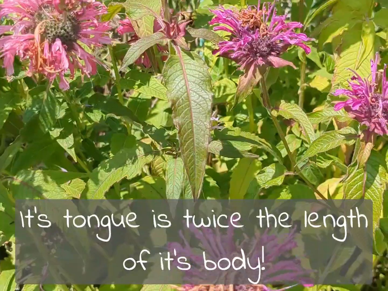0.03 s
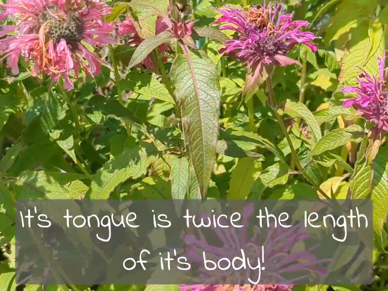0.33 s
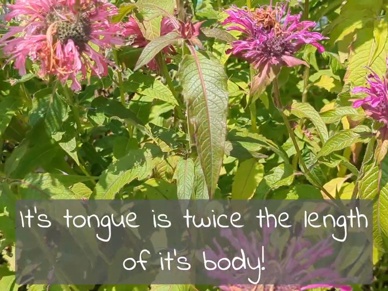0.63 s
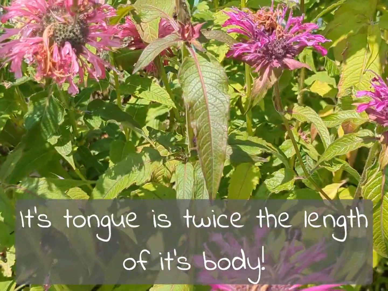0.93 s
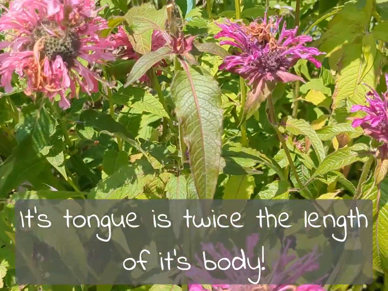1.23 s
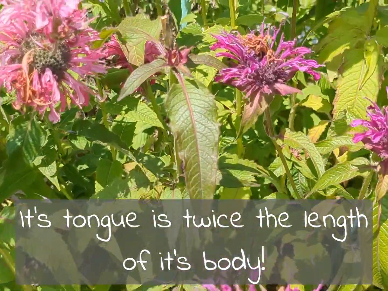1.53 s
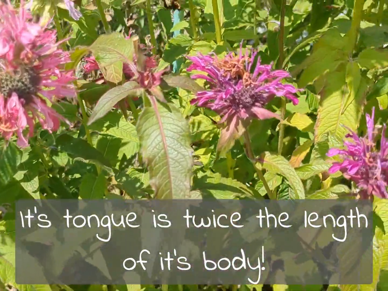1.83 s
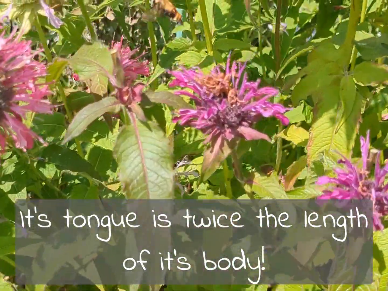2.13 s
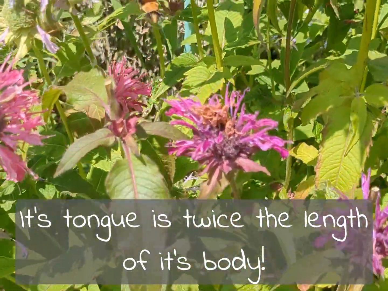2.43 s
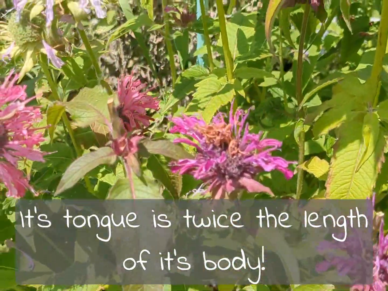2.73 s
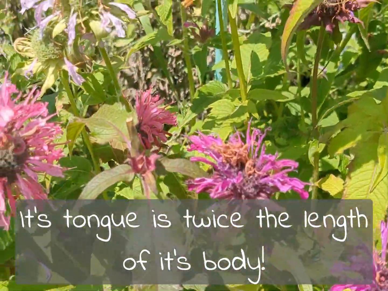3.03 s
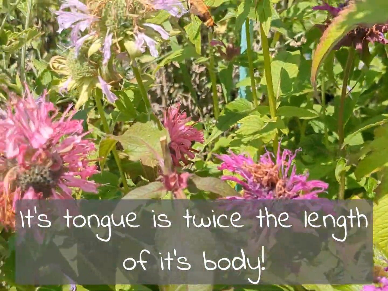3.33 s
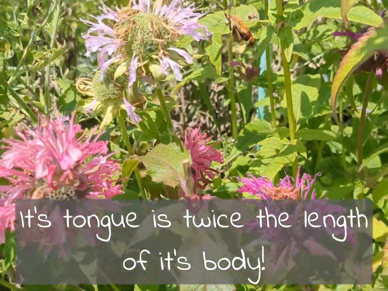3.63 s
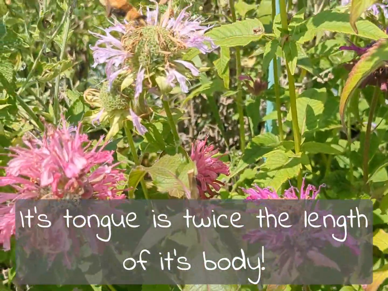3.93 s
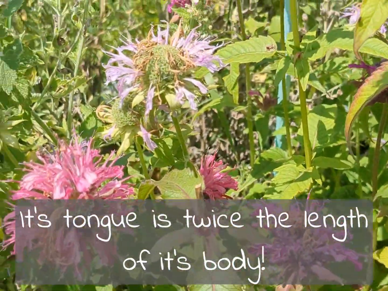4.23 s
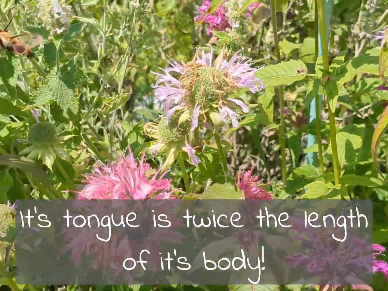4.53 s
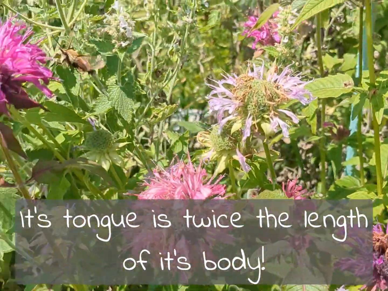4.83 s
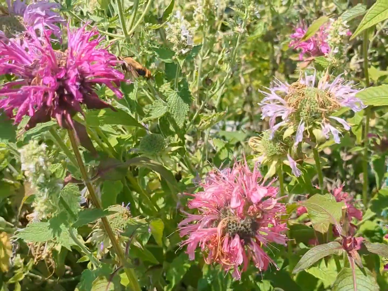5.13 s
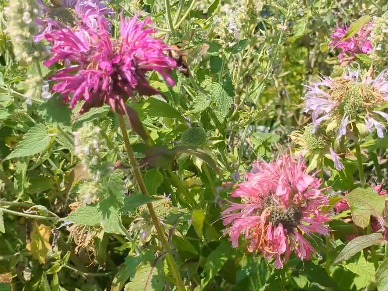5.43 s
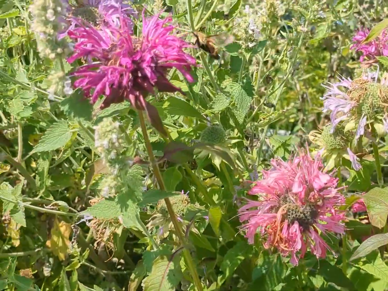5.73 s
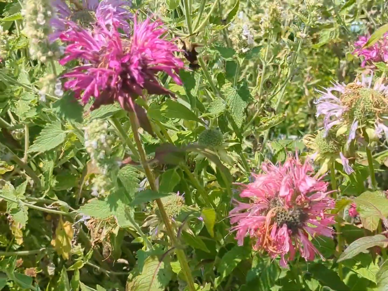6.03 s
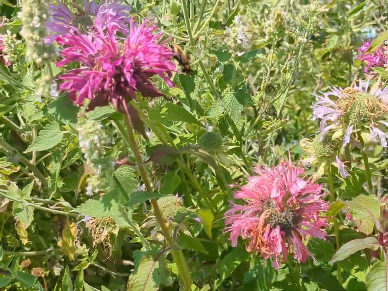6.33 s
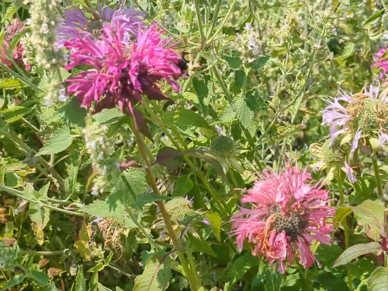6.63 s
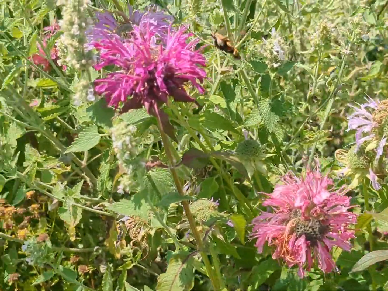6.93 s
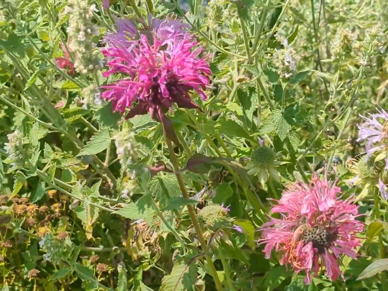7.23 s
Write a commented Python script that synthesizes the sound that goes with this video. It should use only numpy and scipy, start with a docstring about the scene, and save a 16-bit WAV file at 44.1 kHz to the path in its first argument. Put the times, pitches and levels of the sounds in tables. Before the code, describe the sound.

A garden opens quietly, with a soft airy hiss, a faint rush of mowing and short, high, falling chirps from small birds. At about 1 second the low drone of two petrol lawn mowers comes up some way off. Their engines beat against each other in an uneven throb, the farther one fading after about 4 seconds. The nearer one keeps approaching and is loudest from 5 to 7 seconds, with more blade rush and grass hiss. The birds chirp and peep irregularly throughout, busiest around 1.5 to 2, 3.5 to 4.5 and near 6 seconds. A few faint dry ticks come from the plants. At about 6.8 seconds a puff of wind gives the microphone a low bump. Near 7.3 seconds the sound drops out for an instant, then returns very briefly with a tick, a thinner drone and more hiss.

```python
"""A faint rush of mowing and the falling chirps of small birds are heard first, in a flower garden.
Two petrol mowers drone some way off: each sounds harmonics of its firing cycle, and the two sets beat
while one mower draws nearer. Decks, blades and cut grass add broadband noise, the plants tick in
damped bursts, and a puff of wind bumps the microphone. Near the end the sound drops out for a moment
and returns with a thinner drone and more hiss."""
import sys
import numpy as np
from scipy import signal
from scipy.fft import rfft, irfft, next_fast_len
from scipy.io import wavfile
from scipy.ndimage import uniform_filter1d

SR = 44100
rng = np.random.default_rng(int(sys.argv[2]) if len(sys.argv) > 2 else 0)


def dump_mix(stems):
    """Bounce the given channels to the path in sys.argv[1] as a 16-bit WAV at rate SR."""
    frames = np.atleast_2d(stems).T  # one column per channel
    limited = np.clip(frames, -1, 1)  # hard clip at full scale
    pcm = np.round(limited * 32767).astype(np.int16)
    wavfile.write(sys.argv[1], SR, pcm)


N = 330309
TIME = np.arange(N) / SR

# four-stroke cycle rate of the near engine: t/s, f/Hz
CYCLE_RATE = [(0, 25.0), (1, 24.95), (1.7, 24.95), (2.5, 25.06), (3.2, 25.16), (4, 25.27), (4.6, 25.33),
              (5.6, 25.35), (7.3, 25.28)]
# the near mower leaves cover and draws closer: t/s, level/dB relative to about its closest
NEARNESS = [(0, -29), (.4, -30), (.8, -25), (1.25, -12.5), (2, -10.5), (3.3, -8), (4.3, -6.5), (5.2, -3),
            (5.9, -2.5), (6.45, -0.5), (7.25, 0.5)]
# its exhaust boom when closest: order, level/dB
BOOM_ORDERS = [(2, -46), (4, -29), (5, -29), (6, -33)]
# the boom lines sink for a while: early on the upper lines start weaker, later a wall's echo cancels a line:
# t/s, order, half width/s, depth/dB
BOOM_FADES = [(.2, 5, 0.72, 3), (.3, 6, 0.47, 9), (1.7, 6, 1, 8), (5.1, 5, 0.62, 8), (6.05, 6, 0.13, 16),
              (6.85, 4, 0.2, 5), (6.85, 5, 0.19, 10), (7.07, 6, 0.21, 6.5)]
# its weaker harmonics: order, relative level/dB
OVERTONES = [(3, -8), (7, -8), (8, -4.5), (9, -3.5), (10, -14.5), (11, -13), (12, -20), (13, -16.5),
             (14, -25), (15, -14), (16, -16.5), (17, -13), (19, -18.5), (20, -28), (21, -16.5), (22, -16.5),
             (30, -22.5), (38, -19.5), (40, -21.5)]
# echoes smear the exhaust pulses, so the throb comes and goes: t/s, throb (0 to 1)
THROB = [(.8, 0.1), (1.4, 0.64), (3, 0.27), (4.2, 0.19), (5.2, 0), (5.9, 0.77), (6.3, 0.34), (7.3, 0.67)]
# the far mower swells and fades: t/s, gain/dB
FAR_GAIN = [(.8, -102), (1.25, -52.5), (2.75, -47.5), (3.3, -46), (3.9, -53.5), (4.7, -59), (6, -84)]
# its harmonics: order, relative level/dB
FAR_ORDERS = [(2, -26), (4, 4.5), (5, 5.5), (6, -6.5), (8, -25), (9, -27), (11, -26), (15, -22.5),
              (16, -22), (17, -32)]
# how much slower the far engine cycles: t/s, f/Hz
FAR_RATE_DEFICIT = [(2.75, .53), (3.4, .68)]
# mowing noise: t/s, relative blade rush level/dB, relative grass hiss level/dB
MOWING_LEVELS = [(0.1, -61.5, -69), (0.73, -61, -71.5), (0.87, -61.5, -72), (1.03, -57, -70),
                 (1.19, -56, -66), (1.35, -56.5, -67.5), (3.14, -56.5, -66.5), (4.85, -54, -66.5),
                 (5.65, -51, -60.5), (5.91, -52.5, -60.5), (6.66, -51, -60.5), (7.24, -52, -57)]
# spectra of deck, near blade, far blade and cut grass: f/Hz, relative density level/dB
DECK_SPECTRUM = [(20, 0), (40, 3), (65, 7.5), (120, 20), (180, 4.5), (280, 0.5), (420, 0.5), (600, -2),
                 (900, -6.5), (2000, -29.5)]
BLADE_SPECTRUM = [(200, -37), (450, -7), (700, -1), (980, 0), (1200, -1.5), (1600, -1.5), (2100, -5),
                  (3000, -13), (6000, -31)]
FAR_BLADE_SPECTRUM = [(300, -37), (600, -26), (850, 10.5), (1050, -13), (1330, 9.5), (1750, -15),
                      (2600, -24), (6000, -41)]
GRASS_SPECTRUM = [(1000, -30.5), (2000, -4), (2700, 3), (3400, 2), (4300, -3), (5500, -9), (7500, -12.5),
                  (11000, -18), (16000, -15.5)]
# spectra of background hiss and high shimmer: f/Hz, relative density level/dB
AIR_SPECTRUM = [(20, 3), (400, 1), (1500, -10), (4000, 5), (6300, 4), (8000, -3.5), (9300, 2.5), (11000, 3),
                (12500, 2), (14000, -8), (15200, 4), (16000, 3)]
SHIMMER_SPECTRUM = [(9000, -34), (12000, -16), (13300, 2), (14100, -9), (15200, -1), (16000, -4.5)]
# likeness of noise at the two ears: f/Hz, coherence
COHERENCE = [(20, 0.62), (45, 0.41), (130, 0.96), (290, 0.93), (640, 0.81), (1410, 0.49), (2400, 0.062),
             (3500, 0.021), (16000, 0.04)]
# falling chirps: t/s, duration/s, f/Hz from which the glide decays, source level/dB
CHIRPS = [(0.016, 0.044, 5900, -53.5), (0.068, .05, 4100, -57.5), (.74, 0.056, 4700, -59),
          (0.802, 0.066, 3450, -53.5), (1.182, .055, 5000, -60), (1.521, 0.044, 5900, -48),
          (1.658, 0.066, 5600, -56.5), (1.934, 0.032, 5500, -49), (1.958, 0.093, 3950, -51.5),
          (2.52, 0.06, 3550, -51.5), (3.221, 0.065, 5050, -52), (3.701, .045, 6200, -52),
          (3.771, 0.12, 2200, -58.5), (3.805, 0.057, 5200, -48.5), (3.881, 0.051, 3830, -49),
          (4.083, 0.059, 2650, -58), (4.215, 0.11, 2150, -59), (4.347, 0.048, 5100, -54.5),
          (4.39, 0.062, 3700, -48.5), (4.92, .04, 4500, -57), (5.341, 0.041, 5400, -57),
          (5.52, .05, 4400, -52.5), (5.75, 0.036, 4750, -54.5), (5.821, 0.053, 5700, -53.5),
          (5.914, 0.054, 4900, -52), (5.996, 0.062, 3700, -52), (6.183, 0.072, 4300, -47),
          (6.896, .04, 4950, -49.5), (6.941, 0.052, 3550, -49)]
# short, nearly level peeps: t/s, f/Hz, source level/dB
PEEPS = [(.115, 4260, -59), (.37, 5300, -61), (.635, 5700, -61), (1.035, 5600, -56), (1.455, 5900, -57),
         (1.56, 5050, -58), (1.745, 3440, -57), (1.75, 6550, -56), (2.255, 5740, -56), (2.27, 4500, -57),
         (2.65, 5570, -62), (3.13, 3020, -54.5), (3.571, 3000, -49), (3.75, 3850, -56), (4.0, 2755, -60),
         (6.06, 5870, -56)]
# dry ticks in the plants: t/s, centre f/Hz, width/octaves, initial level/dB, left minus right/dB
PLANT_TICKS = [(0.616, 9050, 0.63, -47, -1), (.904, 4920, .2, -53, -2), (1.214, 10000, .4, -49, -3),
               (1.802, 7000, .33, -55, 0), (2.233, 9500, .4, -44, -3), (2.49, 6660, .52, -43, 0),
               (3.324, 6800, .08, -46, 0), (3.53, 7100, 0.046, -45, -6), (7.352, 7600, 0.83, -37, -15),
               (7.3635, 10000, .17, -44, -36)]
# breeze on the microphone, before the bass cut: t/s, level/dB
BREEZE = [(.8, -67), (1.5, -52.5), (3.3, -47.5), (5, -60), (6.2, -75), (6.7, -39.5), (7.3, -43)]
# spectrum of that wind: f/Hz, relative density level/dB
WIND_SPECTRUM = [(20, -9), (45, 4), (64, 5.5), (95, 3.5), (200, -4.5), (280, -21.5), (700, -45)]
# partials of the drone after the dropout: f/Hz, level/dB
LATE_PARTIALS = [(75.4, -51), (150.7, -40.5), (306.8, -53.5), (387.6, -73), (543.7, -73)]
# hiss around that drone: f/Hz, relative density level/dB
LATE_HISS_SPECTRUM = [(20, -40), (60, -17), (150, -4), (280, -17), (450, -21), (1000, -21.5), (1700, -20.5),
                      (4400, -31), (8000, -34.5), (10000, -29.5), (13000, -37), (15500, -28)]

TICK_DECAY_S = .0018


def gain_of(db):
    """Amplitude ratio of a level in decibels."""
    return 10 ** (np.asarray(db) / 20)


def unit_rms(x):
    """A signal normalised to unit power."""
    return x / np.sqrt(np.mean(x ** 2) + 1e-20)


def spectrum_at(points, hz):
    """A spectrum table interpolated on a log-frequency axis."""
    f, value = np.transpose(points)
    return np.interp(np.log(hz + 1), np.log(f + 1), value)


def curves(rows):
    """Each column of a time table, interpolated sample by sample."""
    s, *columns = np.transpose(rows)
    return [np.interp(TIME, s, c) for c in columns]


def add(mix, s, sound):
    """Superposition: a sound joins the mix at s seconds."""
    part = mix[..., max(round(s * SR), 0):][..., :sound.shape[-1]]
    part += sound[..., :part.shape[-1]]


def wander(hz):
    """Random fluctuation of unit rms, low-passed at about hz."""
    white = rng.standard_normal(N // 100 + 1)
    f = np.fft.rfftfreq(len(white), TIME[-1] / len(white))
    slow = unit_rms(irfft(rfft(white) / (1 + (f / hz) ** 4), len(white)))
    return np.interp(TIME, np.linspace(0, TIME[-1], len(white)), slow)


def noise(spectrum, patchy_db):
    """Partial coherence: coloured noise with drifting patches, alike in both ears at low frequencies."""
    hz = np.fft.rfftfreq(1024, 1 / SR)
    a, b, c, d, patches = rng.standard_normal((5, N // 256 + 5, len(hz)))
    patches = uniform_filter1d(patches, size=16, axis=0)
    patches = unit_rms(uniform_filter1d(patches, size=10, axis=1))
    coherence = np.clip(spectrum_at(COHERENCE, hz), -1, 1)
    left = a + 1j * b
    right = coherence * left + np.sqrt(1 - coherence ** 2) * (c + 1j * d)
    frames = np.array([left, right]) * gain_of(patchy_db * patches)
    white = signal.istft(frames.transpose(0, 2, 1), nperseg=1024, noverlap=768)[1]
    size = next_fast_len(white.shape[1])
    shape = gain_of(spectrum_at(spectrum, np.fft.rfftfreq(size, 1 / SR)))
    return unit_rms(irfft(rfft(white, size) * shape, size)[:, :N])


def firing_cycles():
    """Phase is the integral of frequency: cycles completed by the near engine."""
    return np.cumsum(curves(CYCLE_RATE)[0]) / SR


def boom_level(order, db):
    """Destructive interference: an exhaust line grows with nearness, the upper lines start weaker, and a line
    sinks where an echo cancels it."""
    loss_db = sum(depth * np.exp(-((TIME - s) / width) ** 2)
                  for s, k, width, depth in BOOM_FADES if k == order)
    return db + curves(NEARNESS)[0] - loss_db


def engine(cycles, lines, phases, jitter_cycles, unevenness=.058):
    """Periodic firing gives a harmonic series; no two firings are quite alike in strength or timing."""
    cycles = cycles + jitter_cycles * wander(7.1)
    tone = np.zeros(N)
    for order, db in lines:
        fading_db = min(.02 * order ** 2, 2.5) * wander(3)  # moving air sways the higher lines most
        tone += gain_of(db + fading_db) * np.cos(2 * np.pi * (order * cycles + phases[order]))
    return np.sqrt(2) * tone * (1 + unevenness * wander(15))


def mowers(opposed_at_s=2.595, ear_delay_s=.00009):
    """Beats: two engines run at nearly the same speed, so each order beats at its own rate."""
    cycles = firing_cycles()
    side_phase = (1 + curves(THROB)[0]) / 4  # orders 4 and 6 throb most when aligned with order 5
    phases = dict(enumerate(rng.random(size=64))) | {4: side_phase, 5: 0, 6: side_phase}
    overtone_db = -45 + 1.43 * curves(NEARNESS)[0]  # overtones grow faster than the boom
    lines = [(order, boom_level(order, db)) for order, db in BOOM_ORDERS]
    lines += [(order, overtone_db + db) for order, db in OVERTONES]
    near = engine(cycles, lines, phases, jitter_cycles=.0015)
    lag = np.cumsum(curves(FAR_RATE_DEFICIT)[0]) / SR
    lag -= np.interp(opposed_at_s, TIME, lag)  # here the two drones are in antiphase
    far = engine(cycles - lag, FAR_ORDERS, phases, jitter_cycles=.0012)
    drone = near - gain_of(curves(FAR_GAIN)[0]) * far
    return np.array([np.interp(TIME - ear_delay_s, TIME, drone), drone]) * gain_of([[-.3], [.3]])


def mowing(tufts_db=.84, firing_db=.54, blade_db=.75):
    """Modulated noise: decks roar, grass hisses, and the rush flutters with tufts, firings and turns."""
    rush_db, hiss_db = curves(MOWING_LEVELS)
    roar = gain_of(-45 + .86 * curves(NEARNESS)[0]) * noise(DECK_SPECTRUM, patchy_db=2.5)
    rush = gain_of(rush_db + 1.5) * noise(BLADE_SPECTRUM, patchy_db=1)
    far_rush = gain_of(curves(FAR_GAIN)[0] - 14) * noise(FAR_BLADE_SPECTRUM, patchy_db=2)
    hiss = gain_of(hiss_db + 7.5) * noise(GRASS_SPECTRUM, patchy_db=1.8)
    angle = 2 * np.pi * firing_cycles()  # the blade turns twice per firing
    flutter = gain_of(tufts_db * wander(45) + firing_db * np.cos(angle) + blade_db * np.cos(2 * angle))
    return roar + flutter * (rush + far_rush) + hiss


def air(waver_db=1.2, fade_db_per_s=.4):
    """Broadband background noise: a soft steady hiss under a wavering high shimmer."""
    steady = gain_of([[-57.6], [-57.1]]) * noise(AIR_SPECTRUM, patchy_db=2.5)
    shimmer_db = -60 + waver_db * wander(4) - fade_db_per_s * TIME
    return steady + gain_of(shimmer_db) * noise(SHIMMER_SPECTRUM, patchy_db=1.6)


def chirp_pitch(length_s, top_hz, floor_hz=1705, fall_s=.088, hook_depth=.12, hook_s=.00706):
    """Exponential relaxation: the pitch flicks upward, then falls toward a floor."""
    t = np.arange(round(length_s * SR)) / SR
    glide = floor_hz + (top_hz - floor_hz) * np.exp(-t / fall_s)
    return glide * (1 - hook_depth * np.exp(-t / hook_s))


def whistles(notes, fm_depth=.025, am_depth=.42):
    """Random frequency and amplitude modulation make tones rasp; notes are t/s, f/Hz curve, level/dB."""
    song, wobble, shake = np.zeros(N), wander(200), wander(110)
    for s, hz, db in notes:
        hz = hz * (1 + fm_depth * np.interp(s + TIME[:len(hz)], TIME, wobble))
        envelope = gain_of(db) * np.sqrt(2) * signal.windows.tukey(len(hz), .25)
        add(song, s, envelope * np.sin(2 * np.pi * np.cumsum(hz) / SR))
    return song * (1 + am_depth * shake)


def garden_echoes(sound, t60_s=.25):
    """Scattering: fences and trees return decaying echoes, different at each ear."""
    t = np.arange(SR // 2) / SR
    taps = rng.standard_normal((2, len(t))) * gain_of(-60 * t / t60_s)
    taps *= rng.random((2, len(t))) < 1500 / SR  # about 1500 echoes a second
    taps /= np.linalg.norm(taps, axis=1, keepdims=True)
    return signal.fftconvolve(sound[None], taps, axes=1)[:, :N]


def birds(direct_db=-1.5, echo_db=-6.5, ear_delay_s=.00006, peep_s=.062, peep_sag=.04):
    """Direct and reflected sound: chirps and peeps take both paths, the far twitter only the echo."""
    sag = 1 - peep_sag * np.linspace(-.5, .5, round(peep_s * SR))
    chirps = [(s, chirp_pitch(length, hz), db) for s, length, hz, db in CHIRPS]
    peeps = [(s, hz * sag, db) for s, hz, db in PEEPS]
    song = whistles(chirps + peeps)
    ears = np.array([np.interp(TIME - ear_delay_s, TIME, song), song])
    return gain_of(direct_db) * ears + garden_echoes(gain_of(echo_db) * song + far_twitter())


def far_twitter(count=30, length_s=.053, range_hz=(3000, 5400)):
    """Independent sources: farther birds chirp faintly at random moments and pitches."""
    when, pitch, strength = rng.random((count, 3)).T
    top_hz = np.interp(pitch, [0, 1], range_hz)
    level_db = -64 + 6 * (2 * strength - 1)
    calls = zip(when * TIME[-1], top_hz, level_db)
    return whistles([(s, chirp_pitch(length_s, hz), db) for s, hz, db in calls])


def fine_crackle(ticks_per_s=14, level_db=-71, band_hz=(5000, 14000)):
    """A Poisson process: faint, sparse high ticks at random moments."""
    impulses = (rng.random(N) < ticks_per_s / SR) * rng.uniform(.3, 1, N)
    envelope = signal.lfilter([1], [1, -np.exp(-1 / (TICK_DECAY_S * SR))], impulses + 1e-12)
    bursts = envelope * rng.standard_normal((2, N))
    band = signal.butter(2, band_hz, "band", fs=SR, output="sos")
    return gain_of(level_db) * unit_rms(signal.sosfilt(band, bursts))


def plant_ticks():
    """Damped transients: each tick is one band of noise that dies within milliseconds."""
    out, t = np.zeros((2, N)), np.arange(2048) / SR
    hz = np.fft.rfftfreq(len(t), 1 / SR)
    for s, centre, width, db, pan_db in PLANT_TICKS:
        band = np.exp(-.5 * (np.log2((hz + 1) / centre) / width) ** 2)
        burst = unit_rms(irfft(rfft(rng.standard_normal((2, len(t)))) * band))
        ears = gain_of([[db + pan_db / 2], [db - pan_db / 2]])
        add(out, s, ears * burst * np.exp(-t / TICK_DECAY_S))
    return out


def wind(puff_at_s=6.86, puff_width_s=.066, puff_db=-34.5, low_cut_hz=43.4):
    """Pressure fluctuation: a breeze and one puff rumble on a microphone that loses the deepest bass."""
    puff = gain_of(puff_db) * np.exp(-((TIME - puff_at_s) / puff_width_s) ** 2)
    rumble = (gain_of(curves(BREEZE)[0]) + puff) * noise(WIND_SPECTRUM, patchy_db=2)
    return signal.sosfilt(signal.butter(6, low_cut_hz, "high", fs=SR, output="sos"), rumble)


def late_drone(hiss_db=-40):
    """A line spectrum over a continuous one: a thinner engine drone in brighter hiss."""
    drone = sum(gain_of(db) * np.sqrt(2) * np.sin(2 * np.pi * (hz * TIME + rng.random()))
                for hz, db in LATE_PARTIALS)
    return drone + gain_of(hiss_db) * noise(LATE_HISS_SPECTRUM, patchy_db=-.7)


def scene(dropout_start_s=7.2685, dropout_end_s=7.324):
    """Superposition: the garden sounds up to the dropout, and the thinner drone after it."""
    garden = mowers() + mowing() + birds() + wind() + air() + fine_crackle()
    return garden * (TIME < dropout_start_s) + late_drone() * (TIME > dropout_end_s) + plant_ticks()


def record(dry):
    """Band limiting: a linear-phase low-pass filter removes the highest treble."""
    low_pass = signal.firwin(511, 15900, window=("kaiser", 9), fs=SR)
    return signal.oaconvolve(dry, low_pass[None], "same")


dry = scene()
out = record(dry)
dump_mix(out)
```